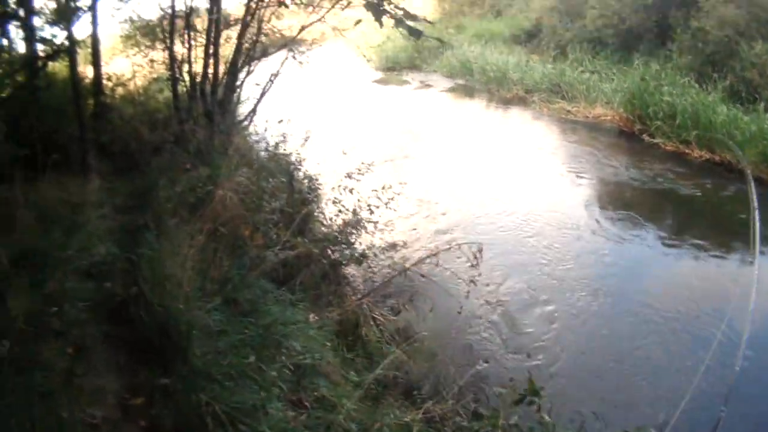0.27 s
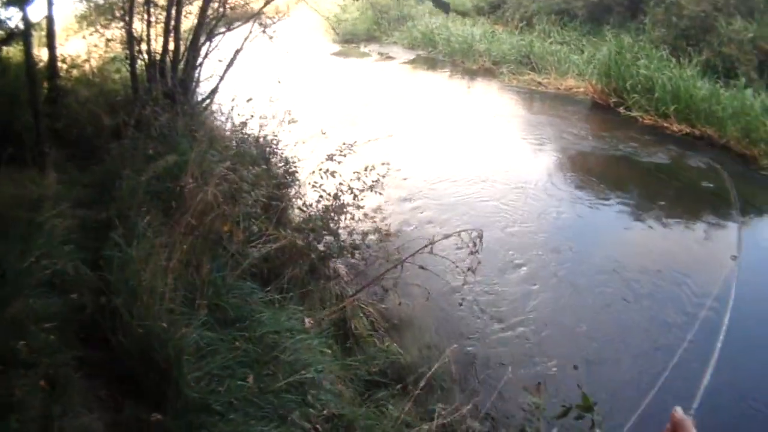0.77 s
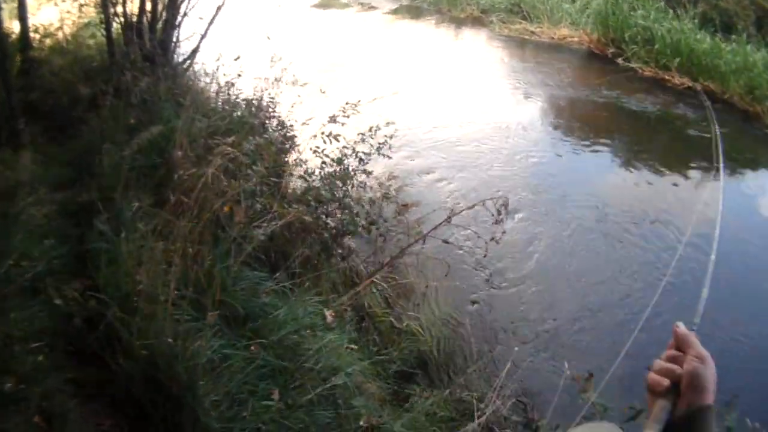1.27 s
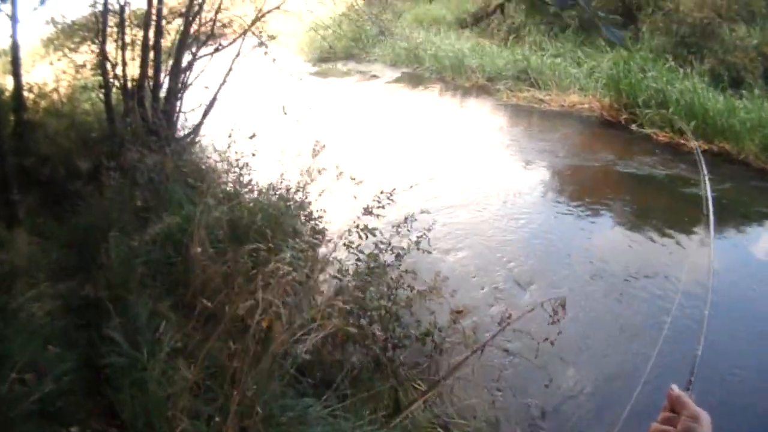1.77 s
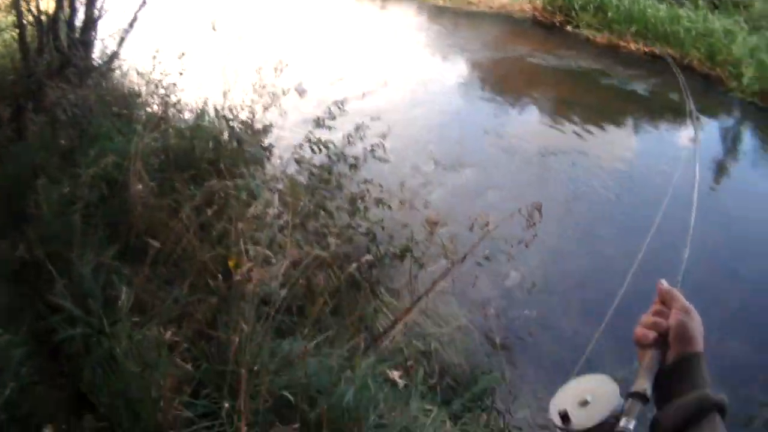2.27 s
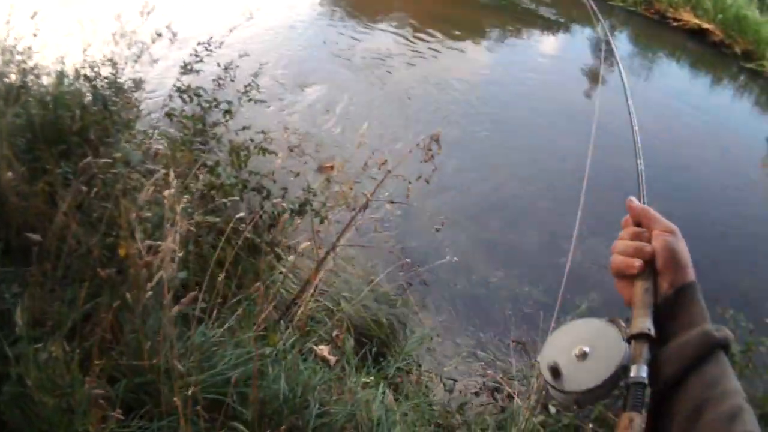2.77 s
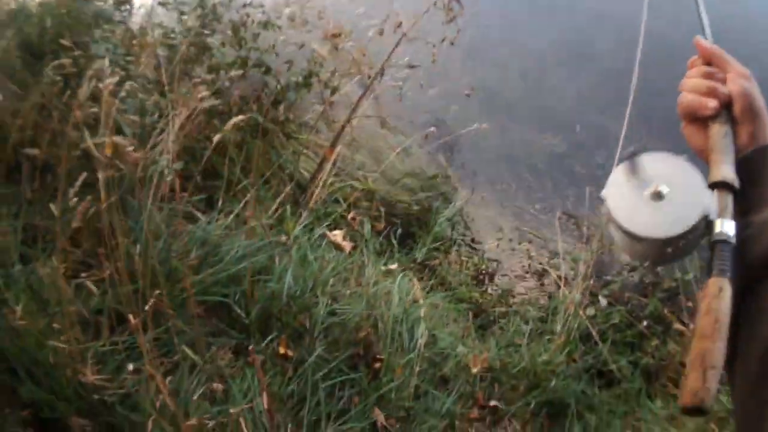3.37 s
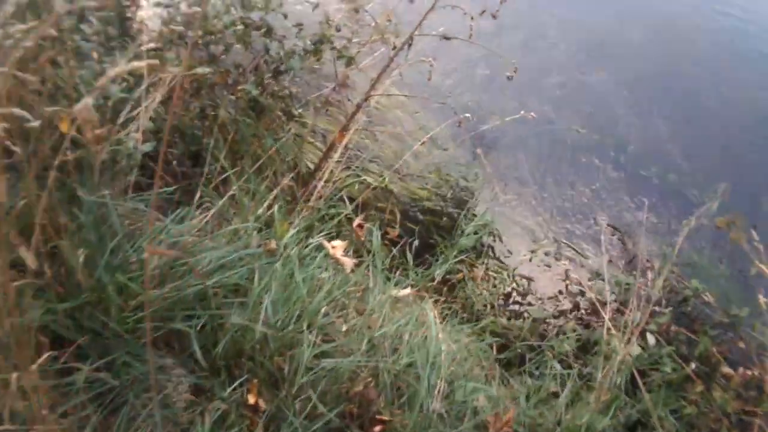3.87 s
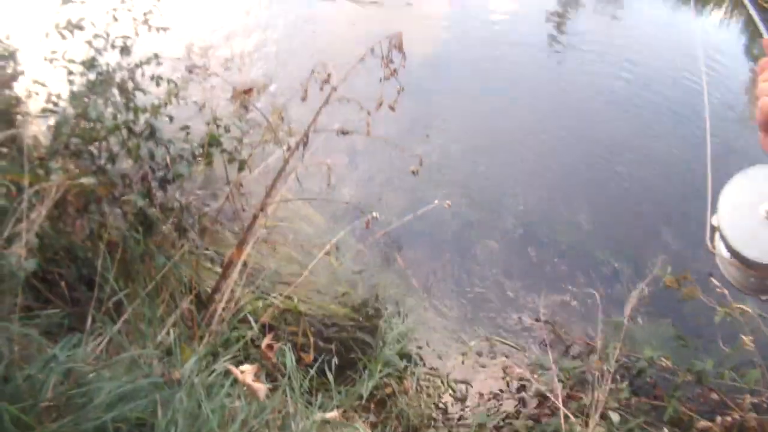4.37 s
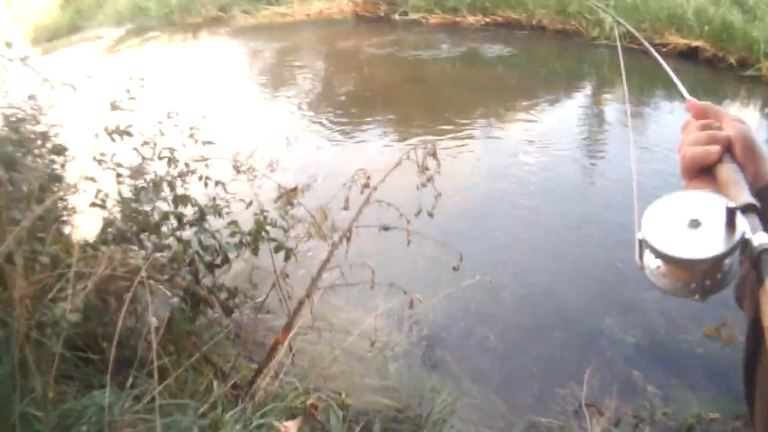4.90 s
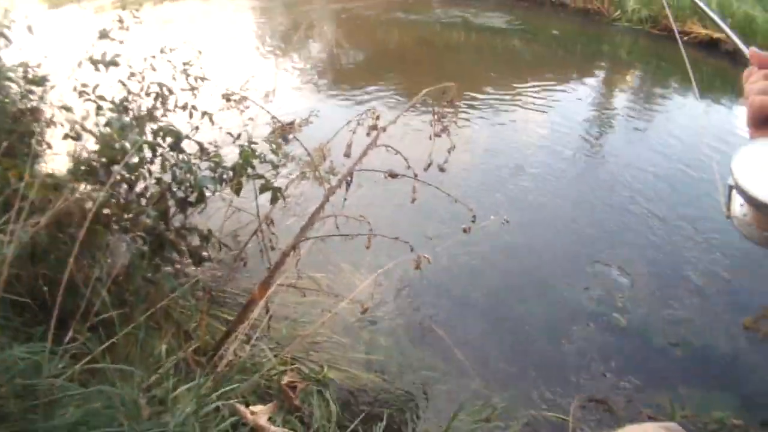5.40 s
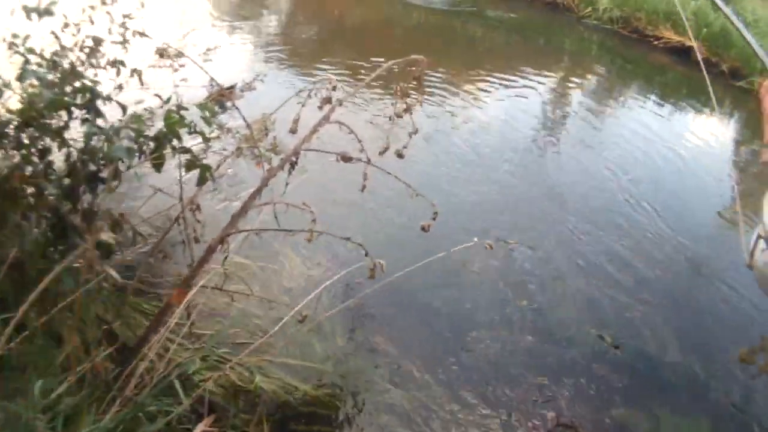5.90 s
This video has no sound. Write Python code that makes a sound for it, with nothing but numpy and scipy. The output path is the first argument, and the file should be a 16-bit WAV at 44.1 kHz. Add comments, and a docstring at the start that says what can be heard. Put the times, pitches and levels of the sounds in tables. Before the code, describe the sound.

A hand-held reel's metal ratchet at arm's length, dry and close, with only a faint short outdoor tail. After isolated weak clicks it spins up suddenly into a buzzing rattle of hundreds of teeth per second, sags midway, speeds up again and swells, then brakes quickly. Crisp clicks follow in two loose clusters, then clothing rustle, one late click and soft knocks, all over steady gentle river noise and low rumble.

```python
"""A ratchet buzzes as line runs off a centre-pin fishing reel on a river bank: the pawl rides over the teeth,
the spool slows to a stop, and single clicks stand before and after. Each tooth scrapes and strikes the pawl;
this impulsive excitation drives the resonant modes of spool, pawl and rim, and nearby surfaces scatter a tail.
Filtered noise bursts make bumps of the angler's gear, a twig-like tick and brushes; grainy noise, rubbing cloth.
Shaped noise makes the soft wash of the river and the low rumble of moving air on the microphone."""
import sys
import numpy as np
from scipy import signal
from scipy.fft import rfft, irfft
from scipy.io import wavfile
from scipy.ndimage import uniform_filter1d

SR = 44100
rng = np.random.default_rng(int(sys.argv[2]) if len(sys.argv) > 2 else 0)


def transcribe(u):
    """Save the signal u as a 16-bit wav file named by the first command-line argument.

    u: samples, shape (n,) or (channels, n), limited to [-1, 1]; the rate is SR.
    q: integer samples, one column per channel.
    """
    v = np.clip(np.atleast_2d(u).T, -1, 1)
    q = np.round(v * 32767).astype(np.int16)
    wavfile.write(sys.argv[1], SR, q)


N = 270973
T = np.arange(N) / SR
RUN_START_S, RUN_END_S = 1.505, 3.654  # the spool runs freely between these times


def undb(db):
    """Logarithmic level: twenty decibels are a factor of ten in amplitude."""
    return 10 ** (np.asarray(db) / 20)


def unit(x):
    """Root-mean-square normalisation: scale to rms 1."""
    return x / np.sqrt(np.mean(x ** 2))


def curve(table, at):
    """Linear interpolation: every column of a time table, read at the given times."""
    s, *columns = np.transpose(table)
    return [np.interp(at, s, column) for column in columns]


def colour(x, points):
    """Spectral shaping: filter by a (frequency [Hz], gain [dB]) curve on a log axis, then scale to rms 1."""
    hz, db = np.transpose(points)
    f = np.maximum(np.arange(N // 2 + 1) * SR / N, 1)
    gain = undb(np.interp(np.log(f), np.log(hz), db))
    return unit(irfft(rfft(x, N) * gain, N))


def walk(rate):
    """Slow random modulation: Gaussian levels held 1 / rate seconds and smoothed twice; spread near 1."""
    hold = int(SR / rate)
    steps = np.repeat(rng.standard_normal(N // hold + 1), hold)
    smooth = uniform_filter1d(uniform_filter1d(steps, hold), hold)
    return 1.1 * smooth[:N]


def add(out, s, sound):
    """Superposition: mix a short sound in at time s."""
    i = max(int(s * SR), 0)
    out[i:i + len(sound)] += sound[:max(N - i, 0)]


def ratchet(energy_db, drop_s, spool_grit, size):
    """Impact excitation of modes: each tooth scrapes pawl and rim, then the pawl drops and rings the spool."""
    # single clicks as the spool is nudged on, and, third, the last tooth of the coast:
    # (time [s], pawl peak [dB], spool relative to pawl [dB], rim relative to pawl [dB])
    single_teeth = [(0.1278, -42, -2.5, -7), (1.2463, -40.5, -5.5, 0), (3.7791, -32, 0, -3),
                    (3.8501, -31.5, -4, -1.5), (3.8859, -32, -1.5, -0.5), (3.9208, -31.5, -2.5, 0.5),
                    (3.9743, -31.5, -3, -0.5), (4.2399, -31.5, -3, 0), (4.3013, -32, -3.5, 1.5),
                    (4.3448, -35.5, 2.5, 5), (4.3928, -34.5, -1.5, 3), (5.411, -38.5, 3.5, 6)]
    # the spool starts, and coasts towards rest, at a steady acceleration:
    # (time [s], speed [teeth/s], acceleration [teeth/s^2], pawl peak [dB], spool relative [dB], rim relative [dB])
    start_motion = (1.4206, 23, 600, -43.5, -4, -1.5)
    coast_motion = (3.6546, 91.5, -605, -30, -1, -5.5)
    # the reel is turned in the hand: (time [s], facing [0 edge on, 1 face on, more beyond])
    hand_turn = [(1.5, 0), (3.0, .58), (3.45, .72), (3.72, 1), (4.3, 1), (5.41, 1.5)]
    # resonances of the spool, pawl and rim; their lobes sweep past the listener as the spool turns:
    # (frequency [Hz], width [Hz], level [dB], swing before the part's multiple [dB], lobes [per turn],
    # angle of the loudest moment [turns])
    spool_modes = [(1805, 77, -2, 3.5, 1, 0.41), (1899, 44, 2, 3.2, 1, 0.42),
                   (2098, 107, -0.5, 2.4, 1, 0.55), (2410, 70, -11, 1, 1, 0.3), (2930, 90, -15, 3, 1, 0)]
    pawl_modes = [(4060, 180, -1, 1, 1, .98), (4200, 300, -7, 1.5, 1, .05), (4500, 200, -10.5, 4.8, 1, .05),
                  (5670, 180, 0.5, 5.6, 1, 0.55), (6010, 220, 3, 2.2, 1, 0.48), (6300, 350, 0, 3, 2, .14),
                  (6490, 320, 4.5, 2.6, 1, 0.15)]
    rim_modes = [(7880, 210, 2.5, 1, 1, 0.044), (9180, 200, -7.5, 1.9, 2, 0.18), (8660, 220, -4.5, 4, 1, 1),
                 (10770, 380, -4, 1.9, 2, 0.017), (11230, 200, -3, 2.6, 1, 0.43),
                 (12100, 290, -4.5, 3.2, 2, .25), (13150, 380, -1, 1.4, 1, 0.84),
                 (13660, 340, -3, 2, 1, 0.12), (14450, 410, -8.5, 1.7, 2, 0.36)]
    teeth_per_turn = 45

    rows = np.vstack([slow_teeth(start_motion, count=5), running_teeth(scatter_db=0.68),
                      slow_teeth(coast_motion, count=7), single_teeth])
    times, db, spool_db, rim_db = rows[np.argsort(rows[:, 0])].T
    db = db + energy_db  # from the peak of a click to its energy
    turns = (np.arange(len(times)) - np.searchsorted(times, RUN_START_S)) / teeth_per_turn
    hz = np.arange(size // 2 + 1) * SR / size

    scrape = scrapes(times, length_s=.002, memory_s=.035, evenness=.5, size=size)
    drop = np.exp(-2j * np.pi * hz * drop_s)  # a pure delay: one sharp blow
    strike = drop + spool_grit * scrape

    # the ring changes colour as the reel turns: slopes in dB per octave from edge on to face on
    facing = curve(hand_turn, times)[0][:, None]
    spool_slope = -17 + (9 - -17) * facing
    treble_slope = 5.5 + (-2.5 - 5.5) * facing
    spool_tilt = undb(spool_slope * np.log2(np.clip(hz, 1700, 2700) / 1950))
    treble_tilt = undb(treble_slope * np.log2(np.maximum(hz, 3500) / 10500))

    spool_body = body(spool_modes, hz, turns, swing=1.25, low_hz=1526, crack_db=-23.5)
    pawl_body = body(pawl_modes, hz, turns, swing=1.2, low_hz=3430, crack_db=-31)
    rim_body = body(rim_modes, hz, turns, swing=.7, low_hz=7500, crack_db=-24)
    parts = [(strike * spool_tilt * spool_body, db + spool_db),
             (scrape * treble_tilt * pawl_body, db),
             (scrape * treble_tilt * rim_body, db + rim_db)]

    between_samples = np.exp(-2j * np.pi * hz / SR * (times * SR % 1)[:, None])
    # while spinning, levels hold on average over about a turn, so the swell within each turn remains
    spinning = (times > RUN_START_S) & (times < RUN_END_S)
    span_s = np.where(spinning, .13, .005)
    near = np.exp(-((times[:, None] - times) / span_s[:, None]) ** 2)
    clicks = 0
    for spectrum, part_db in parts:
        wave = irfft(spectrum * between_samples, size)
        energy = near @ np.sum(wave ** 2, axis=1) / near.sum(axis=1) / SR
        clicks = clicks + wave * (undb(part_db) / np.sqrt(energy))[:, None]
    out = np.zeros(N)
    for s, click in zip(times, clicks):
        add(out, s, click)
    return out


def running_teeth(scatter_db):
    """Phase integration of speed: a tooth falls at each whole count; strike level does not depend on speed."""
    # the pull on the line spins the spool: (time [s], speed before the wobble [teeth/s])
    pull_speed = [(1.5, 58.3), (1.688, 213), (1.867, 225.1), (2.083, 150.9), (2.202, 152.1), (2.326, 105.9),
                  (2.449, 189.2), (2.755, 234.9), (2.845, 214.2), (3.196, 284.8), (3.434, 246.4),
                  (3.555, 136.8), (3.66, 80)]
    # teeth grow louder as the reel is lifted towards the microphone:
    # (time [s], pawl peak before scatter [dB], rim relative to pawl [dB])
    lift_levels = [(1.5, -40.5, -7.5), (2.2, -39.6, -4.7), (2.35, -37, -4), (3.0, -34.7, -2.2),
                   (3.45, -31.7, -1.3), (3.65, -30.3, -5)]
    spool_db = -1.2  # ring of the running spool, relative to the pawl
    jitter_s = 1.7e-5  # standard deviation of the tooth times
    wobble_hz, wobble_crest_s = 5.15, 3.154  # rate, and the moment of one crest
    wobble_share, wobble_at = .043, 250  # share of the speed, at this many teeth per second

    t = T[(T >= RUN_START_S) & (T <= RUN_END_S)]
    rate = curve(pull_speed, t)[0]
    # the speed wobbles, most likely as the bent rod bounces; its depth grows with the square of the speed
    depth = wobble_share * (rate / wobble_at) ** 2
    wobble = depth * np.cos(2 * np.pi * wobble_hz * (t - wobble_crest_s))
    passed = np.cumsum(rate * (1 + wobble)) / SR
    count = int(round(passed[-1]))
    times = np.interp(np.arange(1, count) / count * passed[-1], passed, t)

    level_chance, time_chance = rng.standard_normal((len(times), 2)).T
    db, rim_db = curve(lift_levels, times)
    # the pawl slips off each tooth slightly early or late
    slipped = times + jitter_s * time_chance
    return np.column_stack([slipped, db + scatter_db * level_chance, np.full(len(times), spool_db), rim_db])


def slow_teeth(motion, count):
    """Uniform acceleration: v^2 = u^2 + 2 a k gives the moment of each tooth k."""
    start, rate, acceleration, *levels = motion
    k = np.arange(count)
    reached = np.sqrt(np.maximum(rate ** 2 + 2 * acceleration * k, 0))
    return [(s, *levels) for s in start + 2 * k / (rate + reached)]


def scrapes(times, length_s, memory_s, evenness, size):
    """Frictional noise excitation: spectra of brief pawl chatter; teeth in quick succession chatter alike."""
    grit = rng.standard_normal((len(times), size))
    alike = np.exp(-np.diff(times) / memory_s)
    for k, a in enumerate(alike):
        grit[k + 1] = a * grit[k] + np.sqrt(1 - a * a) * grit[k + 1]
    contact = np.exp(-(T[:size] / length_s) ** 4)
    spectra = rfft(grit * contact)
    # hard, tiny contacts spread their energy evenly over frequency
    for _ in range(2):
        evened = spectra / np.abs(spectra) ** min(evenness, 1)
        spectra = rfft(irfft(evened) * contact)
    return spectra / np.sqrt(np.mean(np.abs(spectra) ** 2, axis=1, keepdims=True))


def body(modes, hz, turns, swing, low_hz, crack_db):
    """Modal superposition: resonances over a broad crack, swinging with spool angle, little below low_hz."""
    power = undb(2 * crack_db)
    for f, width, db, swing_db, lobes, angle in modes:
        facing = (swing * np.cos(2 * np.pi * round(lobes) * (turns - angle)))[:, None]
        detuning = (hz * hz - f * f) / ((hz + 1) * width)
        power = power + undb(db + swing_db * facing) ** 2 / (1 + detuning ** 2)
    power = power / (1 + (low_hz / (hz + 1)) ** 16)
    power = power / (1 + (hz / (1.15 * modes[-1][0])) ** 16)
    # the causal, minimum-phase response with this power spectrum
    cepstrum = irfft(np.log(power + 1e-7))
    cepstrum[:, 0] /= 2
    cepstrum[:, len(hz) - 1:] = 0
    return np.exp(rfft(cepstrum))


def bank(x, wet_db, t60, damp_hz):
    """Diffuse scattering: ground, grass and the angler's body return a faint, decaying tail."""
    t = T[:SR // 8]
    decay = np.exp(-np.log(1000) * t / t60)
    tail = rng.standard_normal(len(t)) * decay * (t > .002)
    tail = signal.lfilter(*signal.butter(1, min(damp_hz, SR / 3), fs=SR), tail)
    tail = tail / np.sqrt(np.sum(tail ** 2))
    return x + undb(wet_db) * signal.fftconvolve(x, tail)[:N]


def gear(t60, grit):
    """Band-limited impact and friction noise: dull knocks of gear, a twig-like tick, brushes of sleeve and grass."""
    # soft knocks: (time [s], peak [dB], pitch [Hz])
    bumps = [(2.342, -36.5, 380), (2.597, -38.5, 380), (3.297, -37.5, 470), (3.765, -40.5, 500),
             (3.792, -39.5, 450), (4.532, -39.5, 340), (4.764, -39.5, 390), (4.799, -42, 440),
             (5.86, -41.5, 450), (6.036, -34, 350)]
    # a sharp twig-like tick, then short brushes of sleeve and grass:
    # (time [s], level [dB], Gaussian length [s])
    noise_bursts = [(0.9893, -43, .0012), (0.998, -53, .004), (5.086, -48, 0.013), (5.85, -57.5, 0.059)]

    out, t = np.zeros(N), T[:SR // 8]
    for s, db, hz in bumps:
        push = np.exp(-np.log(1000) * t / t60) * grit * rng.standard_normal(len(t))
        push[0] += 1
        band = signal.butter(3, [hz / 2.3, hz * 1.36], "band", fs=SR, output="sos")
        knock = signal.sosfilt(band, push)
        add(out, s, knock / np.abs(knock).max() * undb(db))
    rustle = colour(rng.standard_normal(N), [(300, -12), (1100, -13), (2000, 5.5), (3200, -8.5),
                                             (5500, -6), (9000, -31), (16000, -32)])
    envelope = sum(undb(db) * np.exp(-((T - s) / length) ** 2) for s, db, length in noise_bursts)
    return out + rustle * envelope


def rubbing(grain_db, flicker_db):
    """Stick-slip friction: cloth slips in tiny uneven steps, modelled as modulated noise of dull colour."""
    # clothing rubs near the microphone, more once the spool is at rest: (time [s], level [dB])
    rub_levels = [(0.0, -62), (0.7, -59), (3.4, -57.7), (4.4, -57.2), (5.0, -53), (5.8, -56), (6.14, -54.5)]
    # spectrum of the rubbing: (frequency [Hz], relative density [dB per Hz])
    rub_colour = [(120, -6), (220, -3), (400, -0.5), (550, -2.5), (800, -14.5), (1300, -19), (2000, -11.5),
                  (3000, -24), (8000, -30.5)]
    unevenness_db = grain_db * walk(160) + flicker_db * walk(14)
    slips = rng.standard_normal(N) * undb(unevenness_db)
    return colour(slips, rub_colour) * undb(curve(rub_levels, T)[0])


def river(ripple_db):
    """Broadband flow noise: an even wash of water with a slight ripple in level."""
    # spectrum of the wash: (frequency [Hz], relative density [dB per Hz])
    river_colour = [(88, -38), (150, -3), (448, -8), (979, -9.5), (1760, -10.5), (2060, -10.5), (2550, -13),
                    (4410, -14.5), (5460, -16.5), (5910, -15.5), (14500, -20), (16000, -28)]
    level_db = -56 + ripple_db * walk(7.8)
    return colour(rng.standard_normal(N), river_colour) * undb(level_db)


def air():
    """Turbulent pressure noise: light air rumbles on the microphone in small random gusts."""
    # spectrum of the rumble: (frequency [Hz], relative density [dB per Hz])
    air_colour = [(5, -17), (15, 2), (24, 1), (36, -5.5), (48, 0), (62, -3), (78, -9), (100, -10.5),
                  (150, -18), (250, -27.5), (500, -60)]
    gust_db, gust_hz = 1.2, 9  # random swell and how often it changes
    puff_s, puff_db, puff_length_s = .17, 6.5, .05  # one stronger gust
    puff = puff_db * np.exp(-((T - puff_s) / puff_length_s) ** 2)
    level_db = -52.5 + gust_db * walk(gust_hz) + puff
    return colour(rng.standard_normal(N), air_colour) * undb(level_db)


def scene():
    """Superposition of sources: the reel at arm's length over the quiet river bank."""
    clicks = ratchet(energy_db=-29.5, drop_s=0.00019, spool_grit=0.43, size=2048)
    reel = bank(clicks, wet_db=-15, t60=0.031, damp_hz=6000)
    around = gear(t60=0.067, grit=0.14) + rubbing(grain_db=2.5, flicker_db=1.27)
    return (reel + around + river(ripple_db=0.6) + air())[None]


def record(dry):
    """Band limitation: a steep low-pass filter removes the top, and a small constant offset is added."""
    top_hz, dc_offset = 16000, .0052  # offset as a share of full scale
    low_pass = signal.ellip(8, .2, 70, top_hz, fs=SR, output="sos")
    return signal.sosfilt(low_pass, dry) + dc_offset


dry = scene()
out = record(dry)
transcribe(out)
```